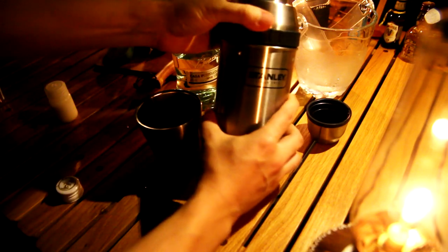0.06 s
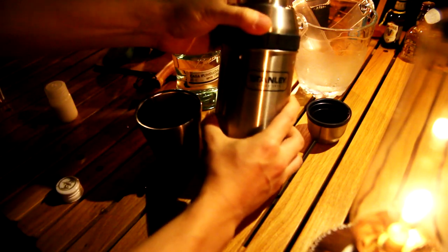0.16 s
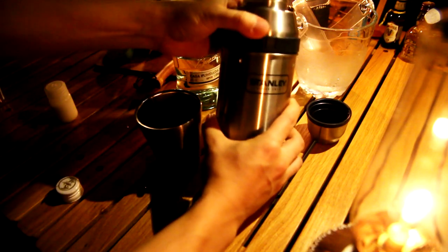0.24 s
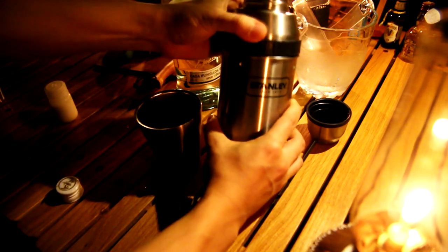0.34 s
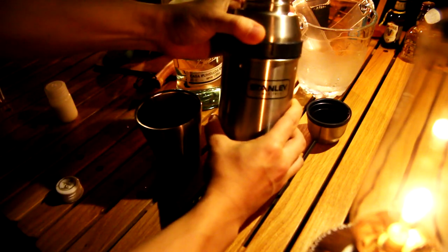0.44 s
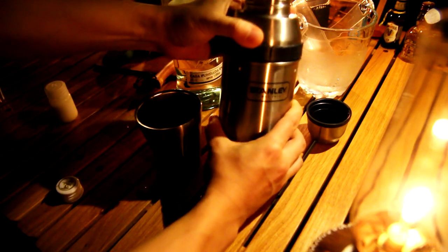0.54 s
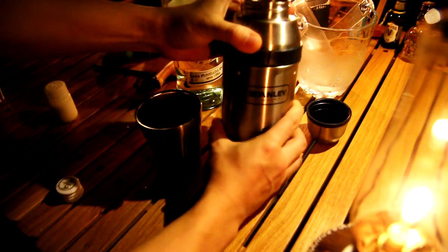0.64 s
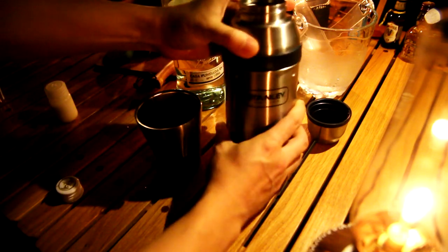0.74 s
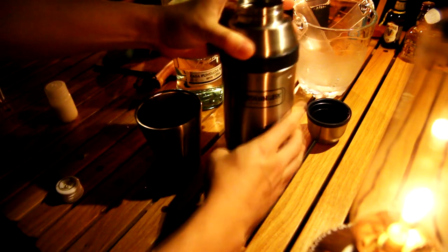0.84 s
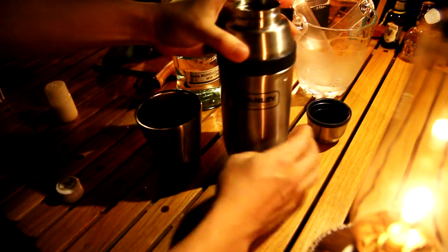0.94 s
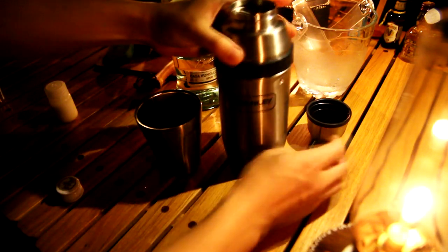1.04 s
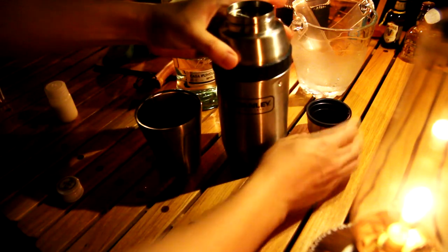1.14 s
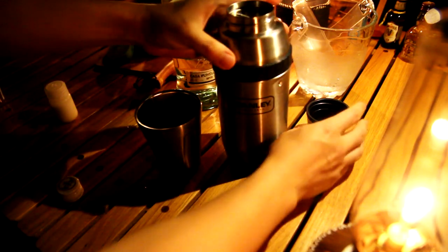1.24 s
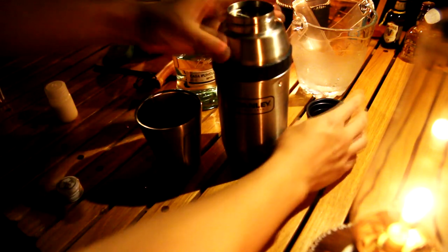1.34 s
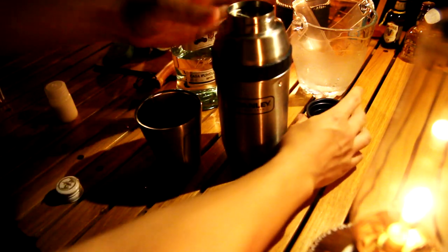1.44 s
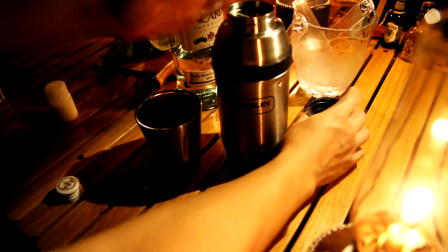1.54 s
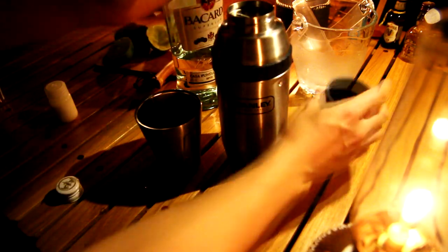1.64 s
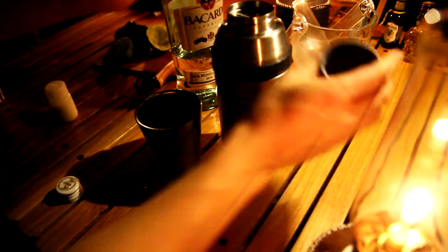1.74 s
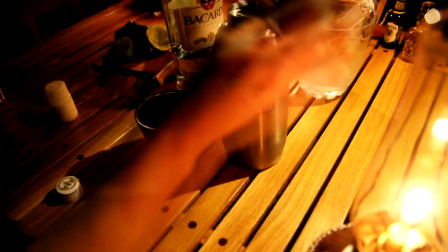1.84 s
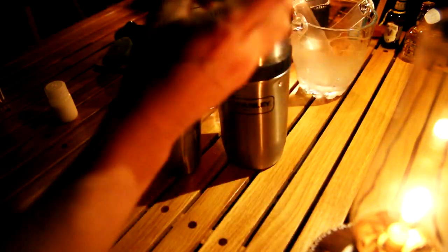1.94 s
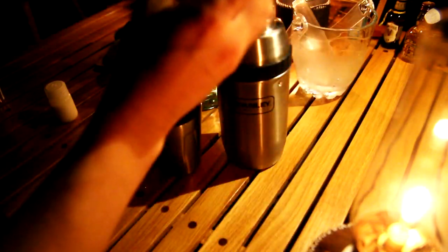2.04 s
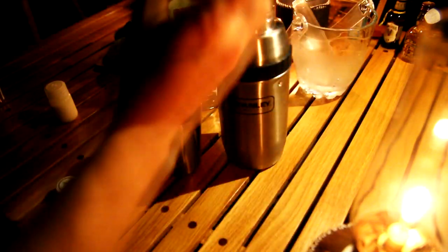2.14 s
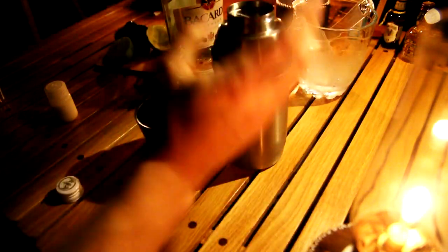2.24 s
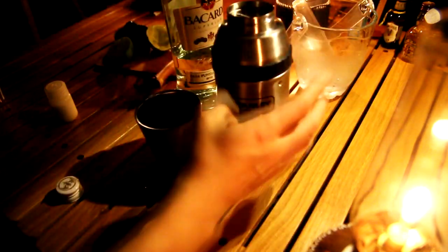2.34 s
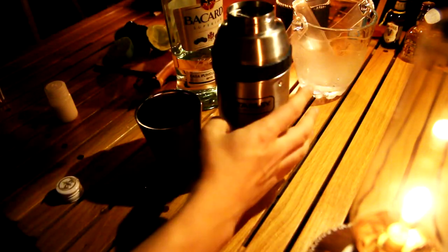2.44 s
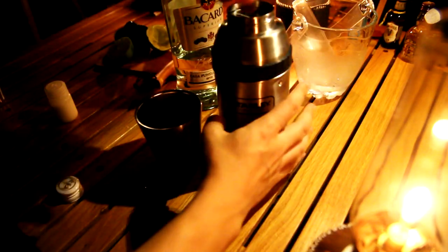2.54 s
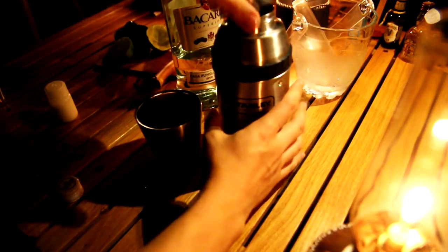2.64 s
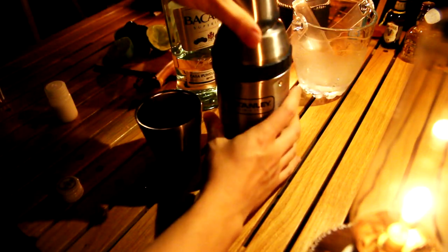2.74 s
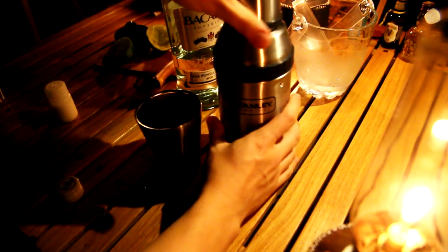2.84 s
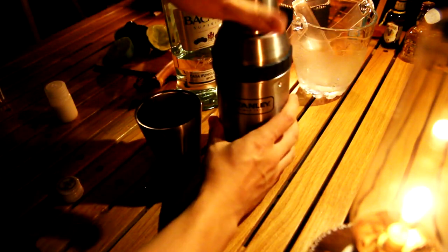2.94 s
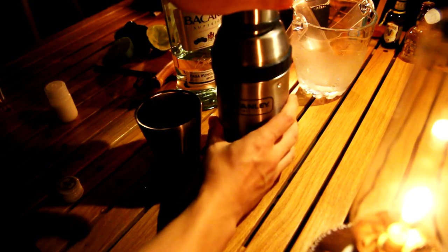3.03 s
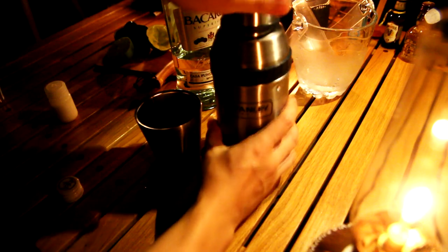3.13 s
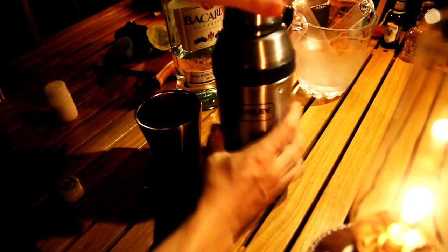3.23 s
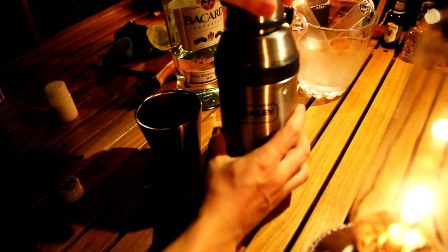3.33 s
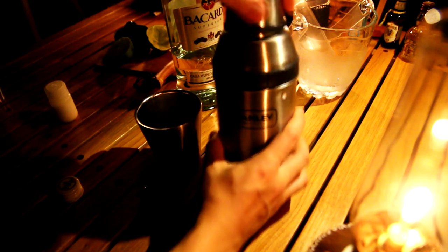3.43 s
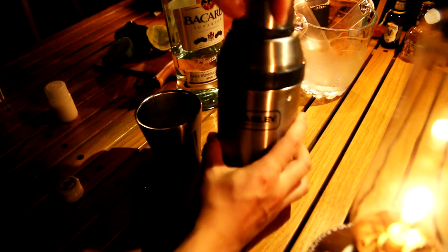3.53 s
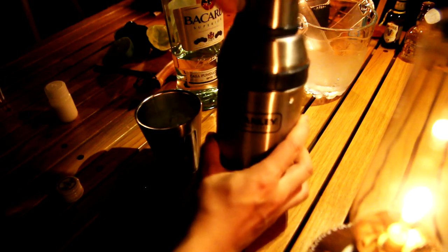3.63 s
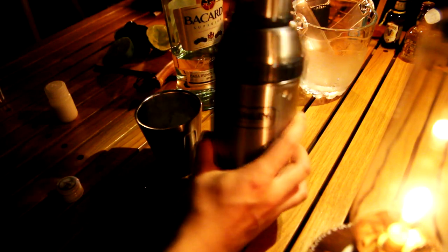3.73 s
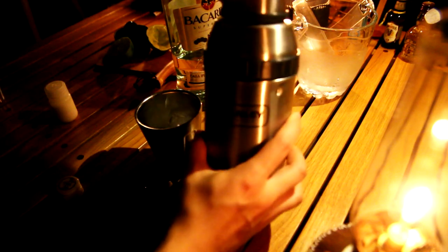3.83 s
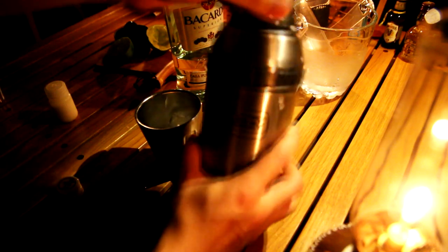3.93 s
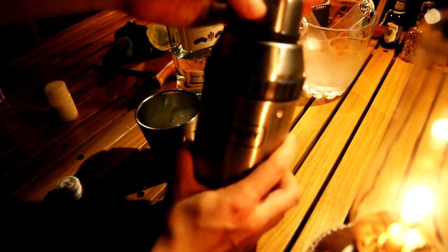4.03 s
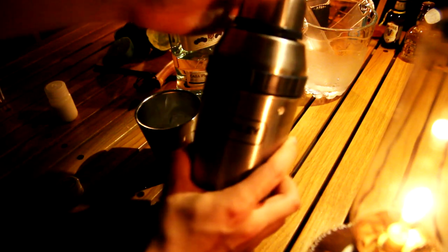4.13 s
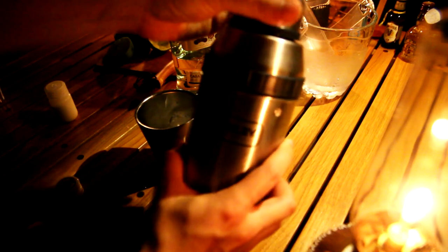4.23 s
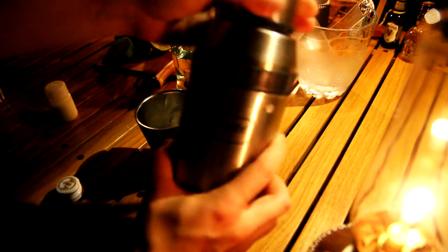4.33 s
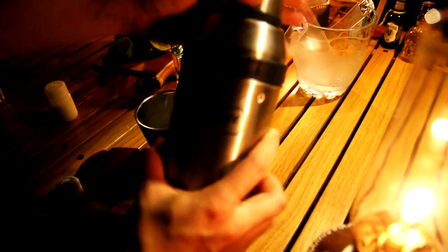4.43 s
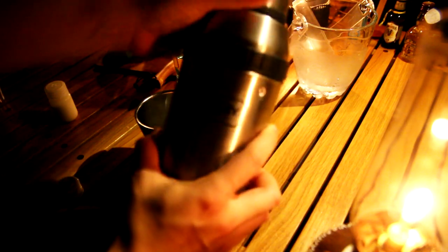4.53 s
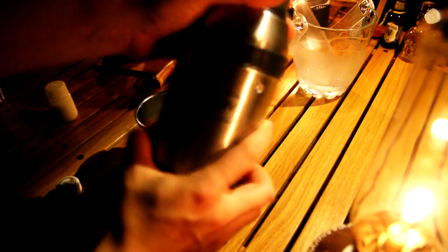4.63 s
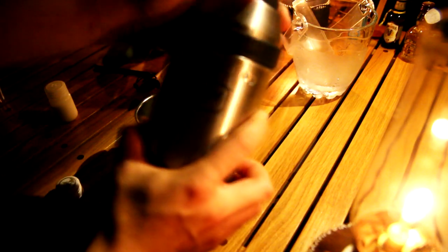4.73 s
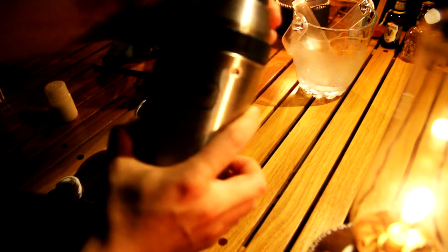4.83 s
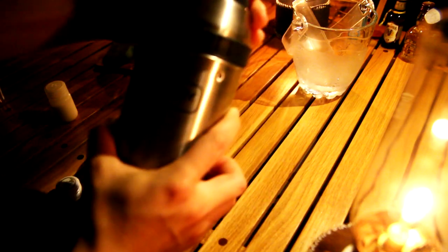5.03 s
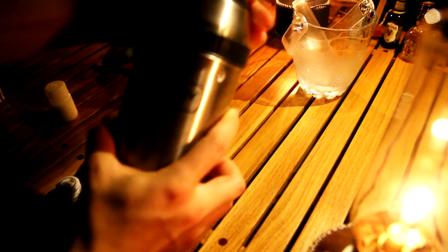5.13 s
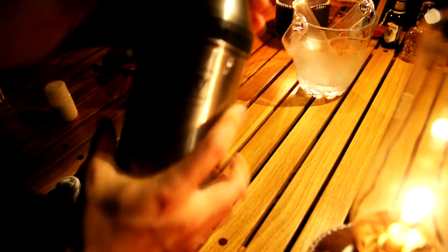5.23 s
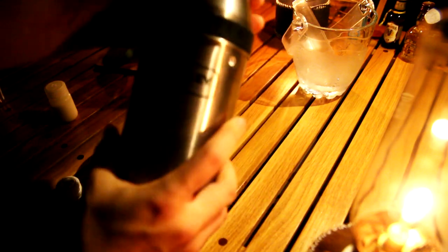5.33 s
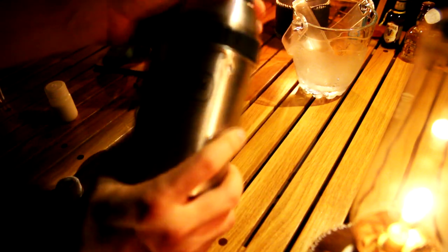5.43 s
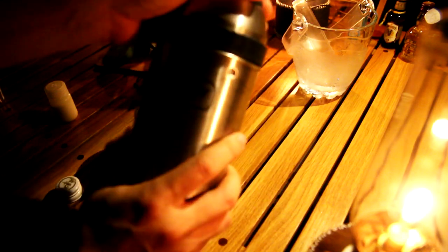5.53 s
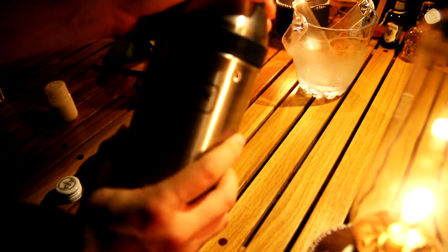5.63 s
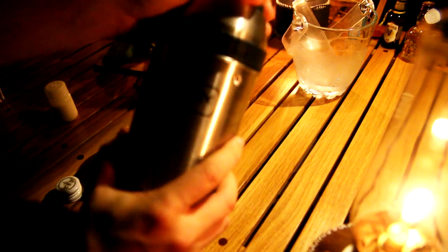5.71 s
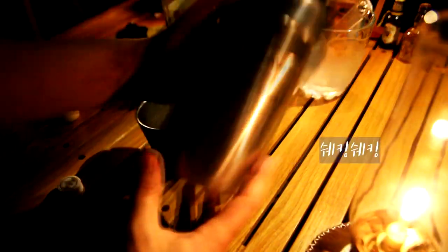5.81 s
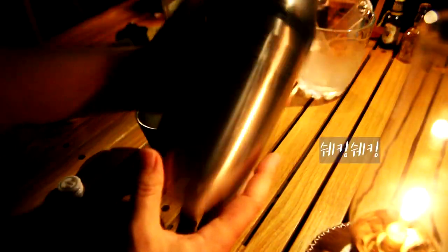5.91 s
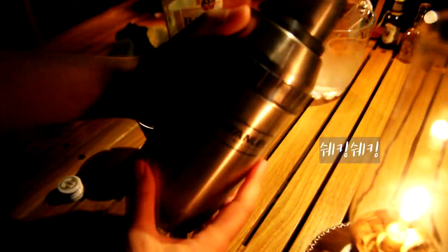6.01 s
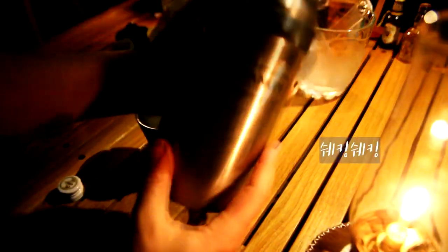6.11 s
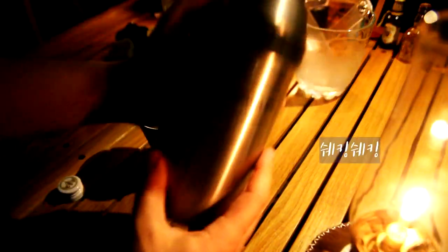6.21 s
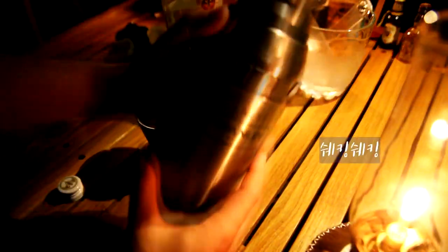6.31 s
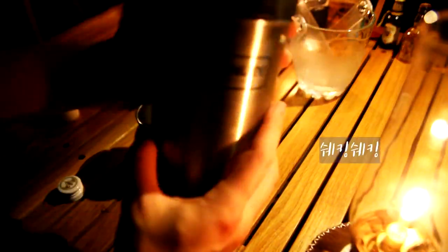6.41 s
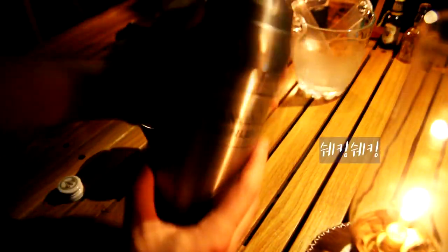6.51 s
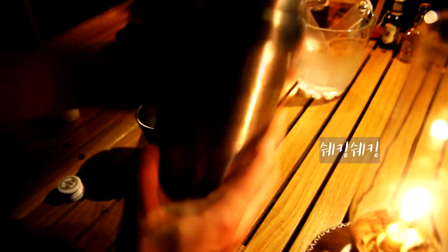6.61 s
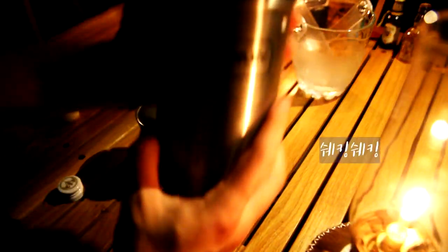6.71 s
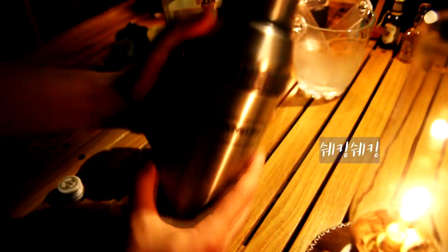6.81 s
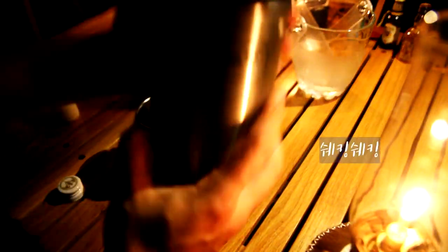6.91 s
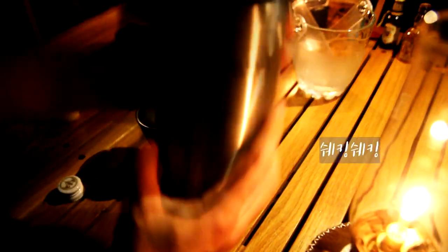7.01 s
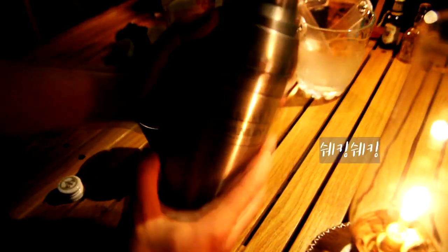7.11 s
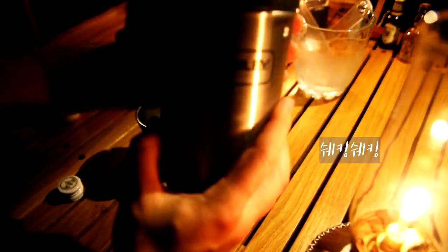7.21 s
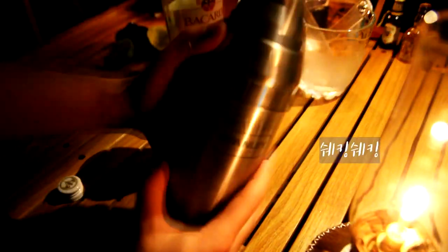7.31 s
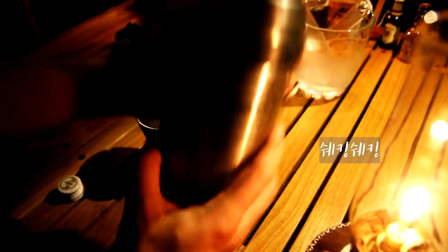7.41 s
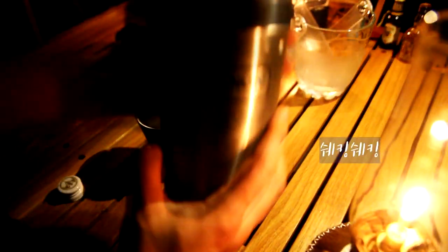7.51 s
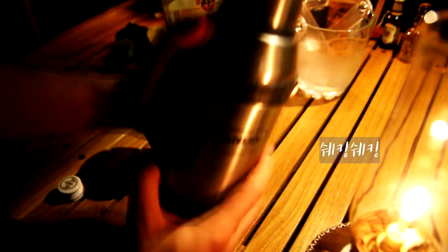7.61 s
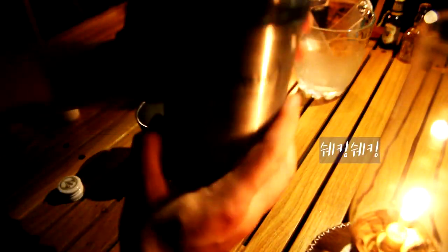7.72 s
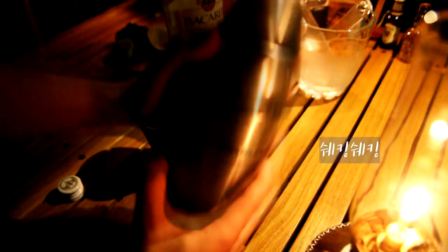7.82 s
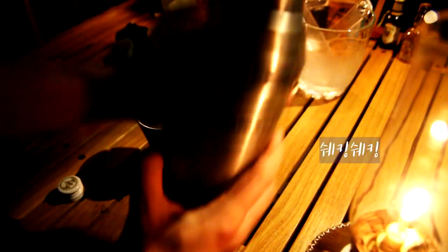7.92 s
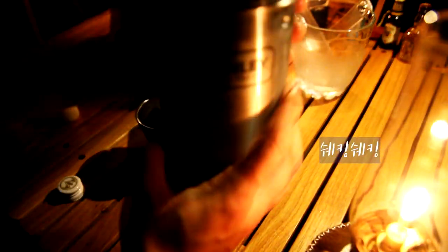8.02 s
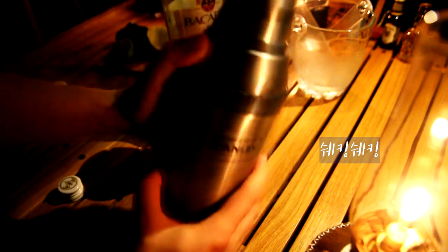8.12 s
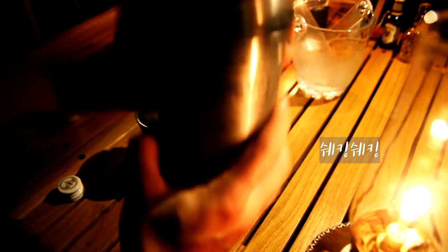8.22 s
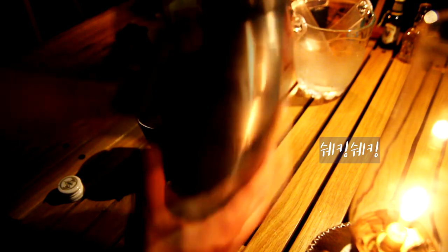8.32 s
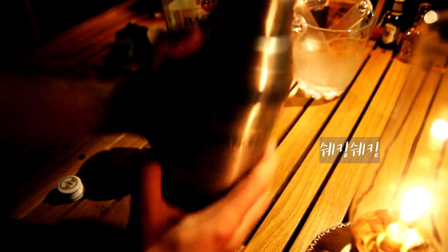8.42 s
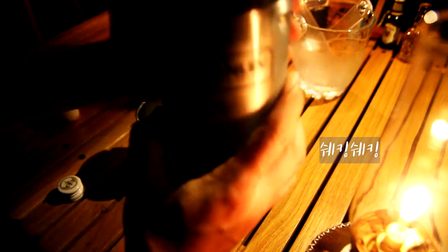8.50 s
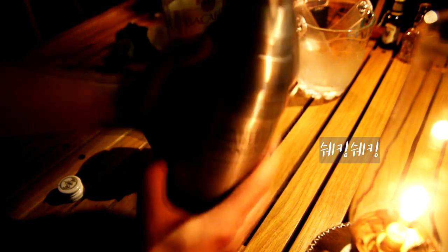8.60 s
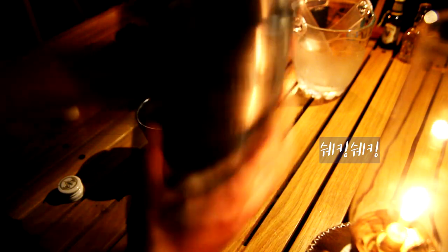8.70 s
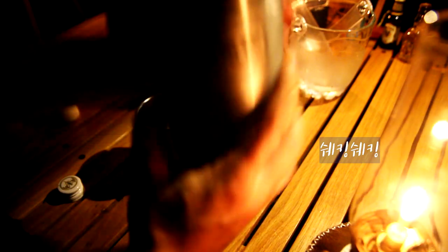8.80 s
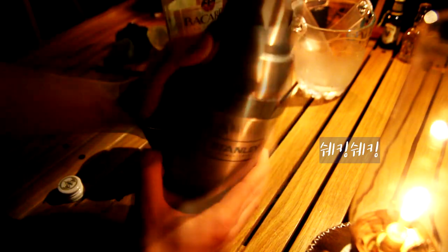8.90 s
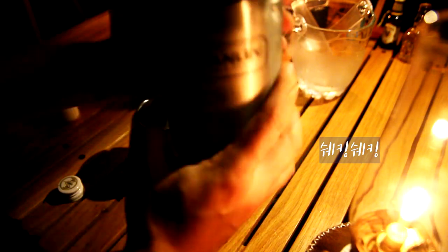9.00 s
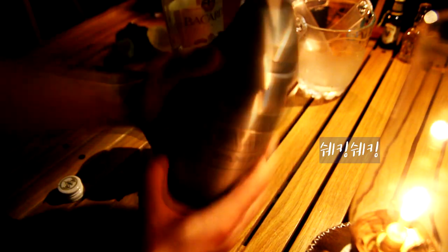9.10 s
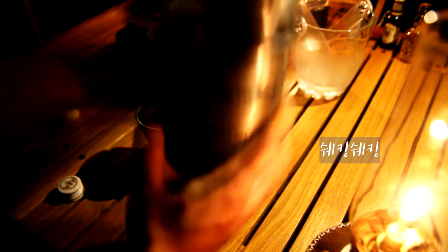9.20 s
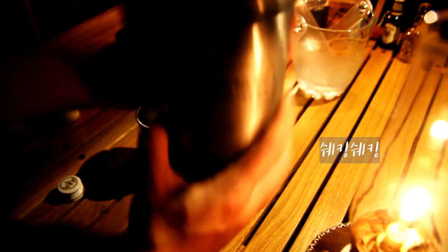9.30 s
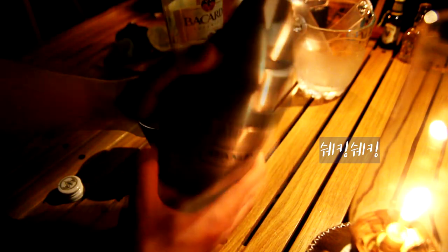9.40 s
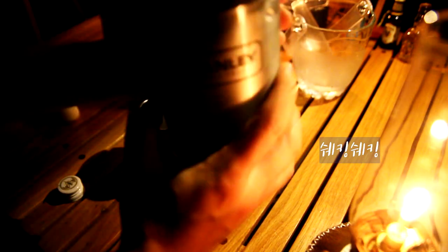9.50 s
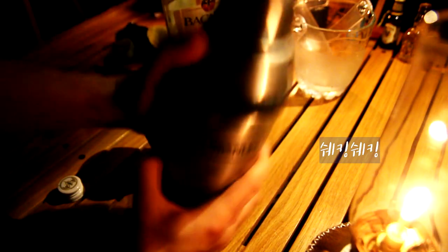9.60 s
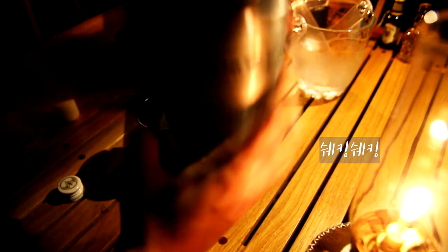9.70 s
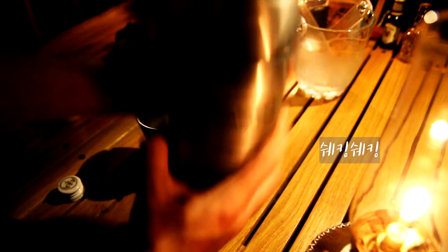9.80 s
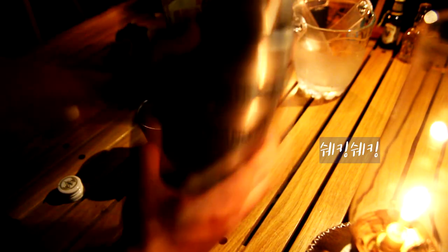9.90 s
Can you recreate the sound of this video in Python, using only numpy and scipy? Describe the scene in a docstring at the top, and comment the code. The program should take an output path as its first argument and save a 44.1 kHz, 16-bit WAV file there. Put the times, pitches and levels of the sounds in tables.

```python
"""On a slatted wooden table outdoors, ice cubes knock about in a hand-held steel shaker, heard close up.
The shaker is set down, its cap is fetched and pressed on, it is tilted and then shaken hard.
Each cube sounds the air inside, the loaded base, the wet wall and a short crack.
Drink and ice chips slosh as shaped noise; knocks, cap and a jolted glass ring as damped modes."""
import sys
import numpy as np
from scipy import signal
from scipy.fft import rfft, irfft, next_fast_len
from scipy.io import wavfile
from scipy.ndimage import map_coordinates

SR = 44100
rng = np.random.default_rng(int(sys.argv[2]) if len(sys.argv) > 2 else 0)


def digitize_waveform(pressure):
    """Quantize a signal to 16-bit integers and store it at the path in sys.argv[1].

    Rows of a 2-D input are taken as channels; values are limited to [-1, 1].
    """
    field = np.atleast_2d(pressure).T
    bounded = np.clip(field, -1, 1)
    quanta = np.round(bounded * 32767).astype(np.int16)
    wavfile.write(sys.argv[1], SR, quanta)


N = 438794

# Outdoor air and hiss. Each row: frequency in Hz, relative density in dB per Hz.
NIGHT_SPECTRUM = [(12, -35), (20, -3), (59, -4.5), (221, 0), (570, -9), (843, -9.5), (1250, -16.5),
                  (1560, -11.5), (1790, -17.5), (4140, -19), (4890, -17), (6290, -21.5), (15800, -23.5)]
# Its level, sinking as the hard shaking starts, then slowly returning. Each row: time in seconds, level in dB.
NIGHT_LEVEL = [(0, -59.5), (5.76, -58.5), (5.82, -114), (9.95, -53)]
# Table-top boom. Each row: frequency in Hz, relative density in dB per Hz.
BOARD_SPECTRUM = [(25, -47), (50, -17), (69, 1.5), (88, -8.5), (107, -4), (140, -15.5), (200, -17),
                  (300, -48)]
# The top booming under hands and vessels. Each row: start in seconds, level in dB, t60 in seconds.
BOOMS = [(.74, -39, 0.61), (1.23, -38.5, 0.41), (2.54, -47, 0.31), (2.82, -43.5, 1), (3.03, -45, 0.76),
         (3.36, -48, 0.38), (3.61, -45, 0.27)]
# Contents on the move. Each row: time in seconds, drink level in dB, chips level in dB, both before trim.
SLOSH_LEVELS = [(0.0, -43, -53), (0.69, -60.5, -66), (0.94, -45, -54), (1.41, -58.5, -65), (2.83, -73, -67),
                (2.97, -55, -55.5), (3.63, -41, -48), (3.77, -55, -58), (5.15, -49.5, -53),
                (5.85, -54, -57.5), (5.99, -41, -44), (7.01, -45.5, -41.5), (7.51, -43.5, -45.5),
                (8.67, -37, -36.5), (8.9, -37, -38), (9.34, -43, -44), (9.64, -35, -40),
                (9.95, -40.5, -40.5)]
# Gurgling drink. Each row: frequency in Hz, relative density in dB per Hz.
DRINK_SPECTRUM = [(120, -51), (200, -16), (382, -1.5), (447, 1), (518, 10), (736, -4.5), (853, 8.5),
                  (1370, 4.5), (2160, -6), (3000, -4.5), (3900, -101), (6600, -120)]
# Ticking ice chips. Each row: frequency in Hz, relative density in dB per Hz.
CHIPS_SPECTRUM = [(1060, -7.5), (1800, 4), (2010, 1.5), (2160, 3.5), (2590, -2.5), (4980, -0.5),
                  (6600, -11), (7780, -9.5), (9240, -11.5), (15100, -26), (15800, -47)]
# Air inside when open, shut, frothy. Each row: second resonance over first, t60 in seconds,
# pitch scatter as a share.
AIR_STATES = [(1.4, .12, .02), (1.9, .12, .015), (1.7, .045, .1)]
# Drink thrown along the shaker lifts the air resonance. Each row: time in seconds, lift in Hz.
THROWS = [(5.801, 220.6), (6.085, 150.9), (6.374, 69.2), (6.599, 90.6), (6.869, 129.6)]
# Ice contacts. Each row: start in seconds, wall peak in dB, thud pitch in Hz, clink pitch in Hz,
# thud level in dB, air ring level in dB.
ICE_CONTACTS = [(0.0508, -28.5, 1300, 2800, -35, -44), (0.0962, -36.5, 1600, 2770, -35, -45),
                (0.1462, -26.5, 1550, 3400, -29.5, -43), (0.2343, -35, 830, 2910, -44, -55),
                (0.2726, -28.5, 1630, 2800, -47, -46), (0.294, -41, 1320, 2280, -40.5, -32.5),
                (0.4106, -42, 1630, 2250, -41, -41.5), (0.5098, -49, 630, 2400, -62, -43),
                (0.5934, -56, 977, 4790, -65, -43), (0.9154, -37, 1300, 2480, -39, -38.5),
                (0.9443, -31, 942, 2590, -41, -36.5), (0.9843, -35, 1380, 2980, -44, -40),
                (1.0019, -32.5, 1330, 2600, -37, -43), (1.022, -43, 970, 2520, -40.5, -45),
                (1.1089, -67, 630, 4960, -61, -41.5), (1.204, -44, 950, 2260, -39, -46),
                (3.1673, -35, 974, 2530, -46, -55), (3.3544, -42, 730, 3200, -41, -42.5),
                (3.3767, -33.5, 1730, 3360, -38, -39.5), (3.395, -36, 884, 2300, -38.5, -47),
                (3.465, -38, 818, 2550, -53, -59), (3.556, -29.5, 844, 2940, -50, -53),
                (3.5667, -27, 786, 3500, -42, -44), (3.5848, -30.5, 716, 2350, -26.5, -33.5),
                (3.6004, -36, 1140, 3060, -33, -41), (3.6188, -41, 824, 2350, -43, -37),
                (3.6442, -26, 1600, 2460, -45, -40), (3.6574, -25.5, 1640, 2210, -27, -36),
                (3.7546, -23, 780, 3370, -42, -45), (3.906, -36.5, 870, 4100, -43, -48),
                (3.9898, -27, 730, 3640, -33.5, -31), (4.0315, -38, 664, 4750, -32, -37),
                (4.0412, -32, 927, 3300, -31, -41), (4.0804, -38, 786, 3930, -49, -53),
                (4.1225, -29, 765, 4200, -61, -48), (4.1828, -33.5, 790, 2830, -56, -48),
                (4.2134, -37, 670, 3200, -33.5, -50), (4.303, -34, 626, 3770, -32.5, -39),
                (4.357, -30.5, 840, 2230, -37, -43), (4.3872, -27, 1320, 5380, -46, -40),
                (4.4218, -35.5, 850, 2450, -47, -39.5), (4.4695, -29.5, 773, 3490, -33.5, -59),
                (4.5496, -41, 756, 2190, -40.5, -43.5), (4.5824, -38, 730, 3610, -44, -49),
                (4.6359, -31, 754, 2350, -43, -41), (4.6724, -37, 756, 2340, -40.5, -43),
                (4.7023, -24.5, 760, 4270, -35, -59), (4.8083, -26, 2070, 3840, -40, -47),
                (4.8384, -31, 870, 2710, -42, -46), (4.8834, -18.5, 920, 4180, -26, -44),
                (4.9578, -24.5, 800, 2610, -33, -43.5), (5.0529, -34, 820, 5480, -40, -36),
                (5.1382, -29, 800, 2450, -37, -40.5), (5.1745, -25, 786, 4180, -50, -46),
                (5.2318, -35, 770, 2480, -49, -53), (5.2652, -29.5, 816, 3560, -41, -41),
                (5.3059, -22.5, 810, 2860, -44, -40), (5.3266, -30, 750, 2850, -44, -58),
                (5.437, -25, 1930, 2850, -37, -39.5), (5.4776, -27.5, 877, 2720, -33.5, -42),
                (5.5033, -23.5, 955, 3660, -49, -58), (5.5598, -32, 920, 3790, -42, -42),
                (5.589, -24, 822, 3590, -38, -39), (5.6456, -41, 803, 2500, -42, -42.5),
                (5.8037, -11, 818, 2530, -19, -35), (5.8283, -17, 640, 2530, -23.5, -34),
                (5.8412, -13.5, 1760, 2300, -22, -37), (5.875, -15, 1860, 5080, -37, -33),
                (5.895, -12, 834, 3590, -33, -25.5), (5.916, -21, 1310, 3800, -26, -34),
                (5.9556, -21, 1050, 5360, -32, -52), (5.9923, -20.5, 1580, 4560, -35, -53),
                (6.0155, -24, 1345, 3010, -29, -47), (6.035, -20, 1530, 3640, -30, -53),
                (6.0423, -15.5, 1573, 5310, -24, -56), (6.0904, -16, 1230, 2360, -26.5, -36),
                (6.107, -13, 1070, 5050, -20, -27), (6.132, -15.5, 1040, 2570, -45, -36),
                (6.1501, -16.5, 1740, 4200, -28, -30), (6.1671, -19.5, 1110, 4150, -39, -39),
                (6.2199, -22, 1603, 3420, -27.5, -44), (6.2369, -21.5, 830, 3780, -42, -37),
                (6.3018, -27.5, 1230, 3770, -30, -49), (6.318, -23.5, 1324, 2520, -26.5, -37),
                (6.35, -22, 1850, 3970, -28.5, -40), (6.3916, -15.5, 1073, 2670, -21.5, -27),
                (6.414, -19.5, 1670, 2330, -33, -32), (6.4466, -14.5, 840, 3470, -32, -31),
                (6.4701, -14, 1750, 2410, -23, -37), (6.5095, -20, 1750, 4030, -50, -48),
                (6.5465, -15, 1340, 3810, -37, -41), (6.6059, -17, 1310, 3760, -38, -66),
                (6.6604, -17.5, 2080, 2400, -40, -39), (6.6674, -19, 820, 4880, -29, -26),
                (6.6772, -13, 836, 2790, -20.5, -39), (6.6937, -14, 1584, 3690, -29, -37),
                (6.7152, -14.5, 1790, 2900, -30, -32), (6.8271, -15, 1600, 2763, -25.5, -47),
                (6.8642, -12.5, 1200, 4480, -33, -33), (6.9035, -14.5, 1170, 4040, -25, -27.5),
                (6.9268, -10, 1107, 3880, -24, -46), (6.9454, -17.5, 1865, 3790, -23.5, -31),
                (6.9934, -20.5, 1334, 3730, -31, -45), (7.0439, -26, 1424, 4880, -34, -57),
                (7.0785, -15.5, 1354, 3040, -25.5, -52), (7.1043, -13, 1402, 3600, -24, -47),
                (7.1912, -14, 1410, 3620, -10.5, -41), (7.2123, -13.5, 1100, 4180, -17.5, -30),
                (7.2568, -27, 1265, 4860, -30, -50), (7.2771, -19.5, 1160, 2690, -37, -55),
                (7.3724, -30.5, 1450, 2490, -39.5, -66), (7.4172, -24, 1335, 2540, -42, -56),
                (7.455, -17.5, 1400, 2190, -15, -54), (7.4784, -14, 611, 2430, -20, -30),
                (7.4895, -20.5, 590, 4820, -28, -30), (7.6102, -22.5, 1366, 3300, -30.5, -54),
                (7.68, -24.5, 1000, 3170, -22, -49), (7.6983, -12, 1250, 4003, -15.5, -41),
                (7.7602, -22, 1840, 3190, -30, -42), (7.789, -23.5, 1290, 2640, -31, -61),
                (7.871, -26, 1404, 2840, -33, -66), (7.8952, -27, 1566, 3650, -33, -63),
                (7.9013, -32, 2030, 3530, -36, -60), (7.9696, -24, 1930, 2540, -29.5, -46),
                (7.9809, -16.5, 1079, 2560, -13.5, -35), (8.0072, -13, 1056, 4730, -16, -35),
                (8.0478, -22.5, 1430, 2180, -32, -37), (8.1187, -26.5, 1485, 4170, -39, -60),
                (8.1613, -20, 1456, 5480, -25.5, -33), (8.1973, -19, 1655, 3700, -26.5, -48),
                (8.2548, -12, 1105, 2200, -16.5, -43), (8.277, -11, 1230, 2590, -13.5, -34),
                (8.2925, -34, 1390, 2340, -17, -52), (8.4136, -18, 1540, 2700, -25, -29),
                (8.4434, -24, 1700, 3330, -24, -36), (8.486, -27.5, 1490, 2250, -24.5, -40),
                (8.5091, -9.5, 939, 2900, -7, -35), (8.538, -13, 950, 5050, -19.5, -31),
                (8.557, -20.5, 1400, 3600, -30, -42), (8.615, -20, 1250, 3040, -28, -56),
                (8.6676, -41, 1506, 2260, -27, -42), (8.6935, -13.5, 1980, 4920, -22, -25.5),
                (8.736, -34, 1440, 2250, -24, -48), (8.753, -21.5, 1740, 2370, -26.5, -44),
                (8.7875, -10, 1058, 3236, -18, -24), (8.7929, -17, 607, 3090, -22.5, -24),
                (8.8435, -21, 1450, 4940, -30, -55), (8.9014, -25, 1480, 4030, -30, -33),
                (8.9291, -23.5, 2020, 3770, -34, -41), (8.9456, -29, 700, 2500, -25, -41),
                (8.976, -21.5, 1296, 2490, -30, -48), (8.9994, -33, 1036, 2650, -37, -50),
                (9.0314, -25, 1558, 2160, -21, -37), (9.0371, -13, 1060, 2600, -16.5, -28),
                (9.0444, -13.5, 1130, 2180, -27, -24.5), (9.0598, -29, 1410, 5100, -22.5, -49),
                (9.0813, -21.5, 1130, 2200, -27, -48), (9.1044, -31, 900, 3760, -30.5, -48),
                (9.1354, -23.5, 1040, 3420, -30.5, -40), (9.2012, -29, 1530, 3630, -36, -42),
                (9.211, -25.5, 1945, 2560, -39, -40), (9.2417, -19, 1730, 2260, -28.5, -39),
                (9.2815, -12.5, 1150, 2860, -13, -28), (9.2918, -13, 703, 4300, -19.5, -31),
                (9.371, -23.5, 1130, 2610, -40, -43), (9.447, -27.5, 1030, 3740, -32, -32.5),
                (9.4804, -29, 1150, 4720, -32, -45), (9.488, -23, 828, 2590, -33, -34.5),
                (9.5004, -30, 890, 4400, -31.5, -44), (9.5304, -14, 1480, 2290, -22.5, -31),
                (9.5418, -28, 730, 3300, -18.5, -31), (9.5632, -19.5, 702, 2870, -23, -25),
                (9.5737, -21, 877, 2190, -27, -38), (9.6367, -27, 606, 2540, -31.5, -33.5),
                (9.6633, -23.5, 1500, 2190, -27.5, -35), (9.6869, -22, 1680, 2550, -27.5, -43),
                (9.7644, -14.5, 764, 3540, -15.5, -21), (9.7731, -18, 830, 3460, -18, -21),
                (9.7894, -20.5, 628, 2660, -21, -24.5), (9.882, -20, 1990, 2390, -32, -30),
                (9.9284, -53, 1530, 2400, -40, -40)]
# Steel wall damped by hands and drink. Each row: frequency in Hz, level in dB, t60 in seconds.
WALL_MODES = [(2290, -31.5, 0.075), (2583, -8, 0.051), (2790, -2, 0.033), (3282, 9.5, 0.012),
              (3814, 2, 0.033), (4285, 6.5, 0.013), (4970, 0, 0.025), (5580, -6, 0.037)]
# Loaded base. Each row: frequency in Hz, level in dB, t60 in seconds.
BASE_MODES = [(700, 2, 0.023), (894, 2, 0.0068), (1060, -7.5, 0.018), (1210, -16.5, 0.012),
              (1553, -7, 0.063)]
# The ice itself. Each row: frequency in Hz, width in Hz, level in dB.
CRACK_RESONANCES = [(7450, 2700, -17), (7870, 1140, 7), (10200, 5500, 0.5), (12800, 4300, -2.5)]
# Steel meeting wood or steel. Each row: start in seconds, level in dB, then low and bright parts
# in dB relative to it, before trim.
KNOCKS = [(0.733, -9.5, -17.5, -34), (0.842, -21, -12, -27), (1.219, -21.5, -12, -41),
          (1.299, -37, -12, -6), (1.56, -48, -22, 2), (1.584, -26.5, -19.5, -27), (1.794, -43, -7.5, -10),
          (2.797, -27, -5.5, -6.5), (2.82, -22.5, -12, -13), (2.858, -24.5, -44, -6.5),
          (2.963, -27, -18, -19), (3.01, -24, -20.5, -42)]
# Table and shaker ringing together. Each row: frequency in Hz, level in dB, t60 in seconds.
TABLE_MODES = [(300.3, -6, 0.45), (411.6, 3, 0.21), (746, 0, 0.2), (830, -15, 0.27), (940, -9, 0.23),
               (1130, 21.5, 0.0073), (1373, -21, 0.41), (1880, -3, 0.13)]
# A jolted glass nearby. Each row: start in seconds, level in dB.
GLASS_JOLTS = [(.735, -44), (1.22, -52), (2.86, -49), (3.17, -42), (3.36, -61), (3.58, -60)]
# Its modes. Each row: frequency in Hz, level in dB, t60 in seconds.
GLASS_MODES = [(6320, 14, 1.9), (5730, 10, 0.43), (7100, -17, 0.3)]
# The cap struck by the neck or a cube. Each row: start in seconds, level in dB.
CAP_CLANKS = [(2.101, -51.5), (2.798, -38), (2.82, -41), (2.859, -28), (2.963, -62), (4.042, -36),
              (4.21, -48), (8.42, -32), (8.695, -29), (8.93, -35), (9.14, -40), (9.64, -34)]
# Steel cap. Each row: frequency in Hz, level in dB, t60 in seconds.
CAP_MODES = [(2034, 23, 0.077), (3900, 9, 0.14), (4170, -37, .09)]
# Air squeezed by the cap. Each row: start in seconds, level in dB, start and end pitch in Hz, t60 in seconds.
PUFFS = [(2.796, -30.5, 302, 130, 0.14), (2.858, -20.5, 234, 110, 0.027)]
# Hands shifting on the vessel. Each row: centre in seconds, level in dB.
GRIP_SHIFTS = [(3.62, -50.5), (4.02, -48), (4.32, -49.5), (5.1, -51)]
# Scattered sound from things nearby. Each row: frequency in Hz, t60 in seconds.
YARD_T60 = [(200, 0.22), (1500, 0.21), (6000, 0.19), (14000, 0.082)]

T = np.arange(SR // 2) / SR
TIME_S = np.arange(N) / SR
TOP_HZ = 16000
CAP_ON_S, FROTH_S, HARD_SHAKE_S = 2.8, 7.06, THROWS[0][0]
OPEN_HZ, SHUT_HZ, FROTHY_HZ, SHAKEN_HZ = 309.5, 415.3, 384, 441.7  # lowest air resonance
GATHER_S, SETTLE_S = 0.053, 0.035  # the lift around each throw
THUD_CREST_DB, AIR_CREST_DB = 5, 6  # peak over tabled level
# Crack level for a -28.5 dB clink; hard blows crack more, cubes flung clear of the drink louder.
CRACK_DB, CRACK_DB_PER_DB, CRACK_SCATTER_DB, AIRBORNE_DB = -50.5, 1.204, 2.5, 6
DRINK_TRIM_DB, CHIPS_TRIM_DB, SURGE_DB = -7.5, -7, -32.5
TICKS_PER_S, TICK_SPREAD_DB, TICK_DB = 17, 9, -12.5  # rate is per mode
BOOM_RISE_S, TREMBLE_DB, LIFTED_S = 0.024, -65, 5.8
GRIP_S = 0.068
YARD_DB = -11.5


def amp(db):
    """Decibels to amplitude."""
    return np.exp(np.asarray(db) * (np.log(10) / 20))


def decay(t, t60):
    """Exponential fall of 60 dB in t60 seconds."""
    return amp(-60 * t / t60)


def unit(x):
    """Scale to rms 1."""
    return x / np.sqrt(np.mean(x ** 2) + 1e-20)


def peak(x):
    """Scale to peak 1."""
    return x / np.max(np.abs(x))


def place(out, start_s, sound):
    """Add a sound at its start time."""
    out[round(start_s * SR):][:len(sound)] += sound


def along(points, hz):
    """Interpolate (Hz, value) points on a log frequency axis."""
    f, v = np.transpose(points)
    return np.interp(np.log(hz + 1), np.log(f + 1), v)


def curves(rows):
    """One value per sample for each column after the time."""
    s, *cols = np.transpose(rows)
    return [np.interp(TIME_S, s, c) for c in cols]


def wobble(knots_per_s):
    """A smooth random curve through normal knots."""
    coarse = np.arange(0, N + 16, 16)
    knots = rng.standard_normal(int(N * knots_per_s / SR) + 4)
    return np.interp(np.arange(N), coarse, map_coordinates(knots, [coarse * knots_per_s / SR]))


def filtered(x, response):
    """x times a complex response of frequency."""
    m = next_fast_len(x.shape[-1] + 1024)
    return irfft(rfft(x, m) * response(np.fft.rfftfreq(m, 1 / SR)), m)[..., :x.shape[-1]]


def coloured(x, spectrum):
    """x given a spectrum, at rms 1."""
    return unit(filtered(x, lambda hz: amp(along(spectrum, hz))))


def grains(rate, spread_db, life_s):
    """Noise broken into small random bursts, rate a second, rms 1."""
    starts = (rng.random(N) < rate / SR) * amp(spread_db * rng.exponential(size=N))
    swell = signal.fftconvolve(starts, decay(T[:SR // 10], life_s))[:N]
    return unit(np.abs(swell) * rng.standard_normal(N))


def ring(modes, t, spread_db, detune):
    """Damped modes struck at a random spot: varied strengths, signs and pitches, peak 1."""
    hz, db, t60 = np.transpose(modes)[:, :, None]
    strength, pitch, sign = rng.standard_normal((3, len(modes), 1))
    swing = np.sin(2 * np.pi * hz * (1 + detune * pitch) * t) * np.sign(sign)
    return peak(np.sum(amp(db + spread_db * strength) * decay(t, t60) * swing, axis=0))


def note(hz, t, t60, tail_db, tail_t60, bend):
    """The mode a blow favours: a quick fall, a weaker tail, the pitch bending as the drink moves."""
    turn = 2 * np.pi * hz * t * (1 + bend * rng.standard_normal() * t)
    return (decay(t, t60) + amp(tail_db) * decay(t, tail_t60)) * np.sin(turn)


def chatter(t, lumps_db):
    """An unclean landing: contact builds within a moment and stutters as it dies."""
    knots = rng.standard_normal(len(t) // 60 + 2)
    lumps = np.interp(t * SR / 60, np.arange(len(knots)), knots)
    return (1 - np.exp(-t / 0.00053)) * amp(lumps_db * lumps)


def fading(spectrum, t, snap_s, wash_s, wash_db):
    """Coloured noise with a quick snap and a longer wash, peak 1."""
    fall = decay(t, snap_s) + amp(wash_db) * decay(t, wash_s)
    return peak(coloured(rng.standard_normal(len(t)), spectrum) * fall * chatter(t, lumps_db=3.5))


def night_air():
    """Outdoor air and hiss: steady noise under a level curve."""
    return amp(curves(NIGHT_LEVEL)[0]) * coloured(rng.standard_normal(N), NIGHT_SPECTRUM)


def table_boom():
    """The top trembles faintly until the hard shaking and booms under hands and vessels."""
    swing = amp(TREMBLE_DB) * (TIME_S < LIFTED_S)
    for start_s, db, t60 in BOOMS:
        age = np.maximum(TIME_S - start_s, 0)
        swing = swing + amp(db) * decay(age, t60) * (1 - np.exp(-age / BOOM_RISE_S))
    return swing * amp(0.83 * wobble(9.6)) * coloured(rng.standard_normal(N), BOARD_SPECTRUM)


def stage():
    """0 while the shaker is open, 1 once shut, 2 once the drink is frothy."""
    return np.searchsorted([CAP_ON_S, FROTH_S], TIME_S)


def air_turns():
    """Running phases of three evenly spaced air resonances; each throw of the drink lifts them."""
    stages, shaking = stage(), TIME_S > HARD_SHAKE_S
    first_hz = np.array([OPEN_HZ, SHUT_HZ, FROTHY_HZ])[stages]
    first_hz = first_hz + (SHAKEN_HZ - SHUT_HZ) * shaking * (stages == 1)
    for s, lift_hz in THROWS:
        distance = np.maximum((s - TIME_S) / GATHER_S, (TIME_S - s) / SETTLE_S)
        first_hz = first_hz + lift_hz * np.exp(-distance) * shaking
    ratio = np.array(AIR_STATES)[stages, 0]
    spacing = 1 + np.arange(3)[:, None] * (ratio - 1)
    return np.cumsum(2 * np.pi / SR * first_hz * spacing, axis=1)


def surge(lead_s, after_s):
    """Motion of the contents: gathering just before each blow, tumbling on after; energies add."""
    blows, t = np.zeros(N), T[:SR // 4]
    for start_s, db, *_ in ICE_CONTACTS:
        blows[round(start_s * SR)] += amp(2 * db)
    shape = np.concatenate([decay(t[::-1], lead_s), decay(t, after_s)])
    energy = signal.fftconvolve(blows, shape ** 2)[len(t):][:N]
    return np.sqrt(np.abs(energy))


def ticks():
    """Small cubes tap the wall and base, each tap ringing one mode through a resonator; rms 1."""
    out = np.zeros(N)
    for hz, db, t60 in WALL_MODES + BASE_MODES:
        luck_db = TICK_SPREAD_DB * np.minimum(rng.exponential(size=N), 2)
        taps = (rng.random(N) < TICKS_PER_S / SR) * amp(db + luck_db)
        keep, step = decay(1 / SR, t60), 2 * np.pi * hz / SR
        out += signal.lfilter([np.sin(step)], [1, -2 * keep * np.cos(step), keep ** 2], taps)
    return unit(out)


def air_hum():
    """The gurgle keeps the three air resonances humming; froth in the air deadens them."""
    voices = [wobble(24) * np.sin(turn) + wobble(24) * np.cos(turn) for turn in air_turns()]
    ringing = np.clip(np.array(AIR_STATES)[stage(), 1] / 0.12, 0, 1) ** 2
    return ringing * amp(3.3 * wobble(10) - 4) * (amp([-1.5, -4, -9]) @ voices)


def slosh():
    """Drink gurgles against the wall and ice chips tick in it, most of all around the blows."""
    drink_db, chips_db = curves(SLOSH_LEVELS)
    drink = grains(rate=220, spread_db=2, life_s=0.025) + 0.4 * rng.standard_normal(N)
    chips = grains(rate=350, spread_db=2.3, life_s=0.012) + 0.3 * rng.standard_normal(N)
    drink, chips = coloured(drink, DRINK_SPECTRUM), coloured(chips, CHIPS_SPECTRUM)
    drink_gain = amp(drink_db + DRINK_TRIM_DB) + amp(SURGE_DB) * surge(lead_s=0.033, after_s=0.21)
    chips_gain = amp(chips_db + CHIPS_TRIM_DB) + amp(SURGE_DB) * surge(lead_s=0.03, after_s=0.24)
    return drink_gain * (drink + air_hum()) + chips_gain * (chips + amp(TICK_DB) * ticks())


def ice_thud(hz, t):
    """The loaded base: a favoured note over its modes, plus a splash of drink."""
    thud = note(hz, t, t60=0.034, tail_db=-27.5, tail_t60=0.45, bend=0.44)
    thud = thud + 0.58 * ring(BASE_MODES, t, spread_db=1.5, detune=0.05)
    splash = fading(DRINK_SPECTRUM, t, snap_s=0.029, wash_s=0.2, wash_db=-37)
    return peak(thud * chatter(t, lumps_db=6.5) + 0.76 * splash)


def ice_clink(hz, t):
    """The wet wall: a favoured note over its modes, plus noise for its many dense ones."""
    wall = 0.91 * note(hz, t, t60=0.011, tail_db=-24, tail_t60=0.013, bend=0.31)
    wall = wall + 0.51 * ring(WALL_MODES, t, spread_db=1.5, detune=0.025)
    dense = fading(CHIPS_SPECTRUM, t, snap_s=0.021, wash_s=0.22, wash_db=-16.0)
    return peak(wall * chatter(t, lumps_db=6.0) + 0.64 * dense)


def crack_response(f):
    """Broad resonances of a cracking cube, alternating in sign."""
    total = 0
    for k, (centre, width, db) in enumerate(CRACK_RESONANCES):
        total = total + (-1) ** k * amp(db) * 1j * f * width / (centre ** 2 - f * f + 1j * f * width)
    return total


def ice_crack(t):
    """The cube itself: a very short noise burst through broad resonances."""
    burst = rng.standard_normal(len(t)) * (decay(t, 0.0078) + amp(-58) * decay(t, 0.016))
    return peak(filtered(burst, crack_response))


def ice_air(turn, t, t60, scatter):
    """The air inside: three resonances following the drink, each slightly off pitch."""
    turn = turn * np.exp(scatter * rng.standard_normal((3, 1)))
    return peak(amp([0, -5, -12]) @ np.sin(turn) * decay(t, t60) * (1 - np.exp(-t / 0.00033)))


def ice():
    """Every contact sounds the air, the loaded base, the wall and the cube."""
    out, t = np.zeros(N + SR), T[:SR // 10]
    turns = np.pad(air_turns(), ((0, 0), (0, SR)), "edge")
    stages = stage()
    for start_s, db, thud_hz, clink_hz, thud_db, air_db in ICE_CONTACTS:
        i = round(start_s * SR)
        _, air_t60, scatter = AIR_STATES[stages[i]]
        turn = turns[:, i:i + len(t)] - turns[:, i:i + 1]
        crack_db = CRACK_DB + CRACK_DB_PER_DB * (db + 28.5) + AIRBORNE_DB * (start_s > HARD_SHAKE_S)
        crack_db += CRACK_SCATTER_DB * rng.standard_normal()
        contact = amp(air_db + AIR_CREST_DB) * ice_air(turn, t, air_t60, scatter)
        contact += amp(thud_db + THUD_CREST_DB) * ice_thud(thud_hz, t)
        contact += amp(db) * ice_clink(clink_hz, t) + amp(crack_db) * ice_crack(t)
        place(out, start_s, contact)
    # The contacts carry no bass: a steep cut below about 150 Hz.
    return filtered(out[:N], lambda hz: (1j * hz / (1j * hz + 150)) ** 4)


def knocks():
    """Shaker and cap meet the table or each other: low and middle modes, slat rattle, bright slap."""
    out = np.zeros(N + SR)
    low_modes = [m for m in TABLE_MODES if m[0] < 600]
    middle_modes = [m for m in TABLE_MODES if m[0] >= 600]
    # Each row: frequency in Hz, relative density in dB per Hz.
    rattle_spectrum = [(160, -70), (250, -1), (500, -6), (1000, 6), (2000, -5.0), (3500, -13.5), (12000, -65)]
    slap_spectrum = [(600, -60), (1500, -32), (2500, -3), (5000, -6.0), (7000, -14.5), (15000, -17)]
    for start_s, db, low_db, bright_db in KNOCKS:
        low = ring(low_modes, T, spread_db=2.5, detune=0.012)
        middle = ring(middle_modes, T, spread_db=2.5, detune=0.012)
        rattle = fading(rattle_spectrum, T, snap_s=0.046, wash_s=0.26, wash_db=-7.0)
        slap = fading(slap_spectrum, T, snap_s=0.024, wash_s=0.2, wash_db=-8.5)
        knock = amp(low_db + 1.5) * low + amp(-1.5) * middle
        knock += amp(bright_db + 6.0) * slap + amp(-3.0) * rattle
        place(out, start_s, amp(db) * knock)
    return out[:N]


def glass():
    """A jolted glass rings on, thin and unsteady, as it buzzes against the slats."""
    out, t = np.zeros(N + SR), np.arange(SR) / SR
    for start_s, db in GLASS_JOLTS:
        tone = ring(GLASS_MODES, t, spread_db=1.5, detune=0.004)
        place(out, start_s, amp(db) * tone * (1 - np.exp(-t / 0.004)))
    return out[:N] * (0.17 + 0.31 * wobble(300)) * amp(0.93 * wobble(29.4))


def cap_clanks():
    """The steel cap's modes ring when the neck or a cube strikes it."""
    out = np.zeros(N + SR)
    for start_s, db in CAP_CLANKS:
        place(out, start_s, amp(db) * ring(CAP_MODES, T, spread_db=2, detune=0.002))
    return out[:N]


def cap_puffs():
    """Air squeezed under the cap: decaying tones of falling pitch."""
    out = np.zeros(N + SR)
    for start_s, db, start_hz, end_hz, t60 in PUFFS:
        hz = end_hz + (start_hz - end_hz) * np.exp(-T / 0.018)
        place(out, start_s, amp(db) * decay(T, t60) * np.sin(np.cumsum(2 * np.pi * hz / SR)))
    return out[:N]


def hand_rub():
    """Hands shifting on the vessel: dull grainy noise in brief swells."""
    swells = sum(amp(db) * np.exp(-((TIME_S - s) / GRIP_S) ** 2) for s, db in GRIP_SHIFTS)
    spectrum = [(40, -70), (90, -30), (170, 0), (300, -2), (500, -25), (1500, -90)]  # (Hz, dB per Hz)
    return swells * coloured(grains(rate=90, spread_db=2, life_s=0.05), spectrum)


def yard(x):
    """A short scattered tail, each frequency dying at its own speed."""
    hz, t, z = signal.stft(rng.standard_normal(SR // 3), SR, nperseg=256)
    tail = signal.istft(z * decay(t, along(YARD_T60, hz)[:, None]), SR, nperseg=256)[1]
    delayed = np.pad(x, (200, 0))  # samples
    return signal.fftconvolve(delayed, tail / np.linalg.norm(tail))[:N]


def scene():
    """Blows with their scattered tail, over the contents, table, hands and air."""
    blows = ice() + knocks() + glass() + cap_clanks() + cap_puffs()
    beds = night_air() + table_boom() + slosh() + hand_rub()
    return (blows + amp(YARD_DB) * yard(blows) + beds)[None]


def record(dry):
    """The loudest blows clip at a rounded ceiling; nothing is kept above the band limit."""
    clipped = dry / (1 + np.abs(dry / 0.44) ** 8) ** (1 / 8)
    return filtered(clipped, lambda hz: hz < TOP_HZ)


dry = scene()
out = record(dry)
digitize_waveform(out)
```